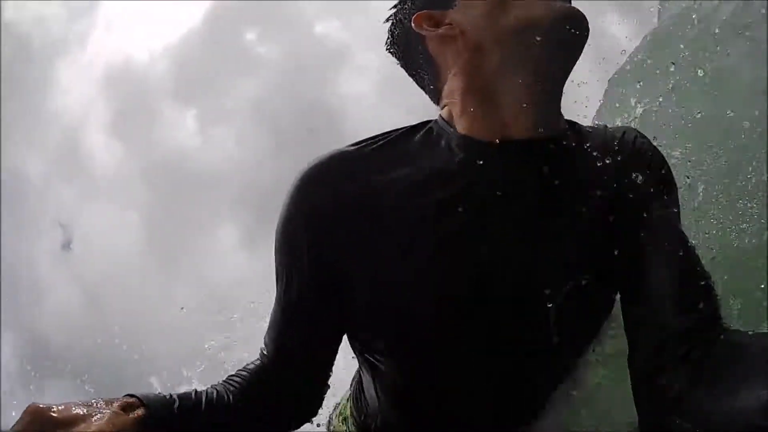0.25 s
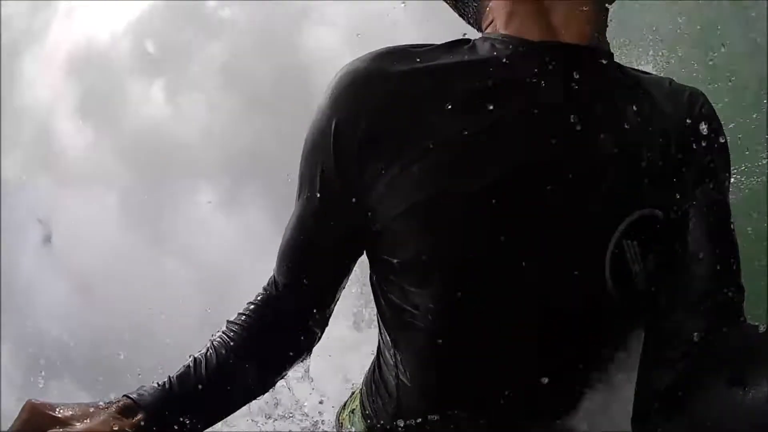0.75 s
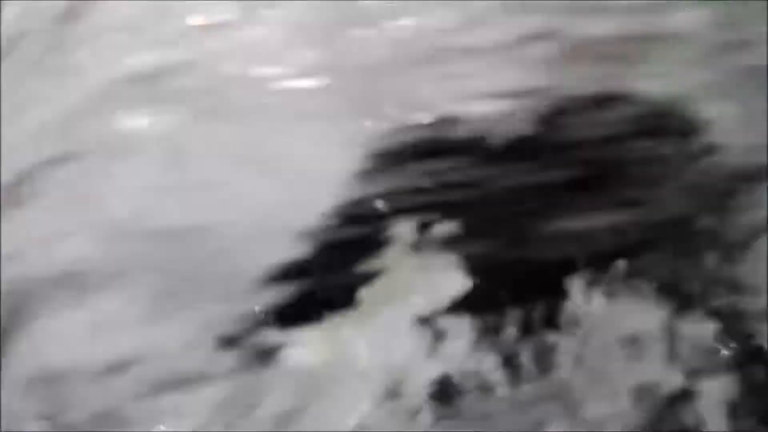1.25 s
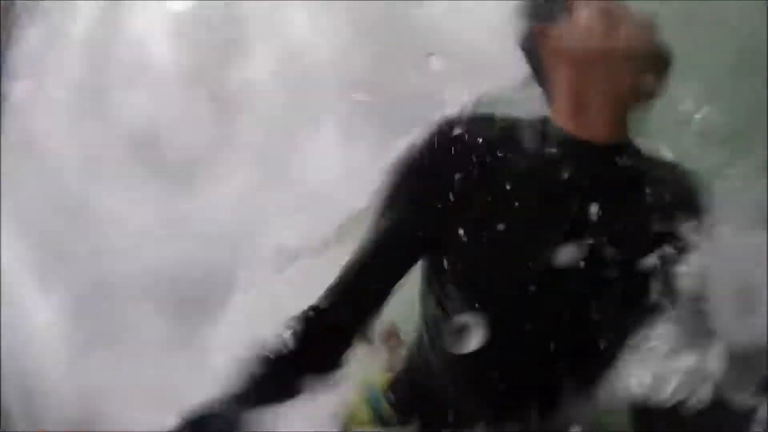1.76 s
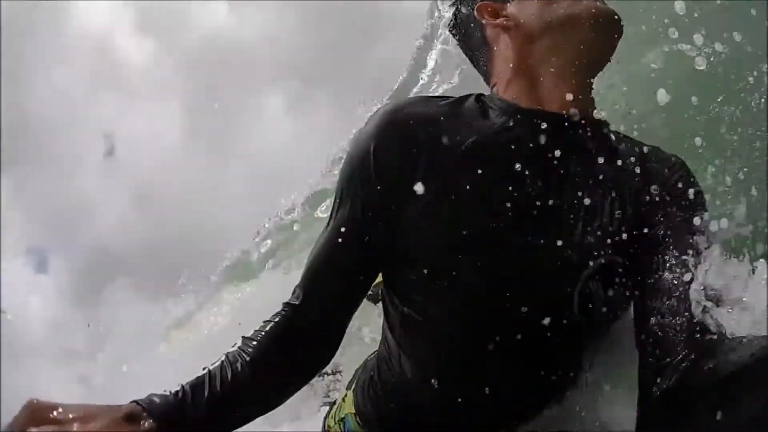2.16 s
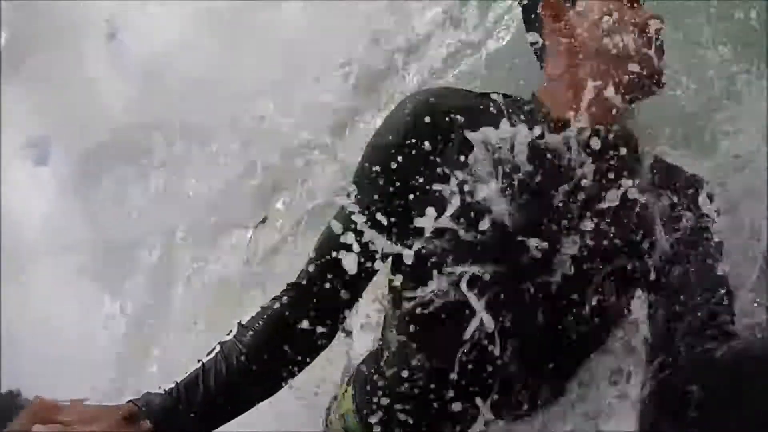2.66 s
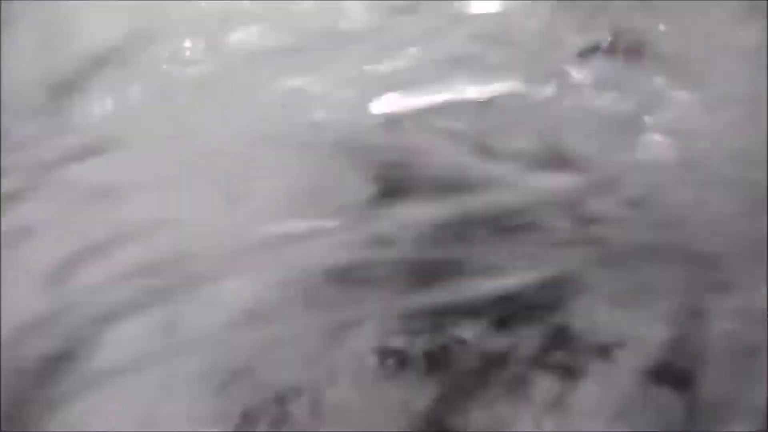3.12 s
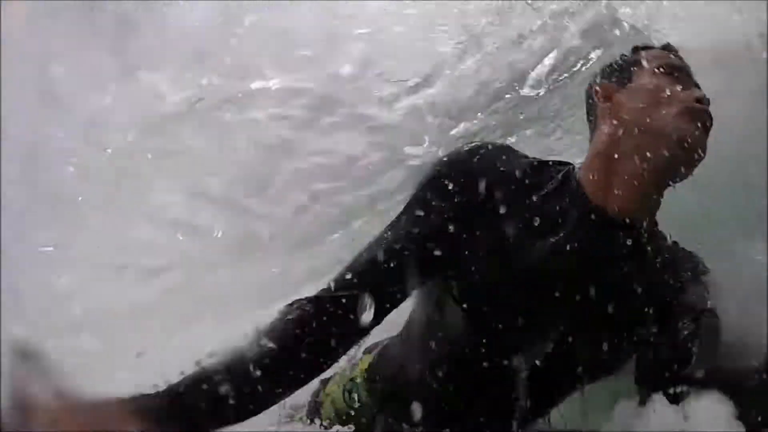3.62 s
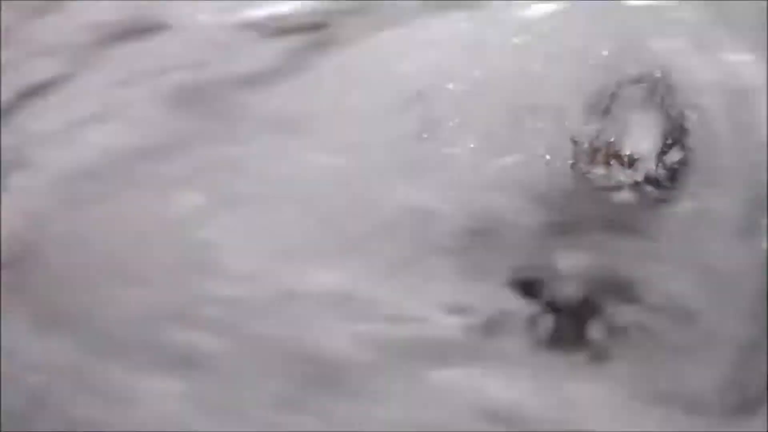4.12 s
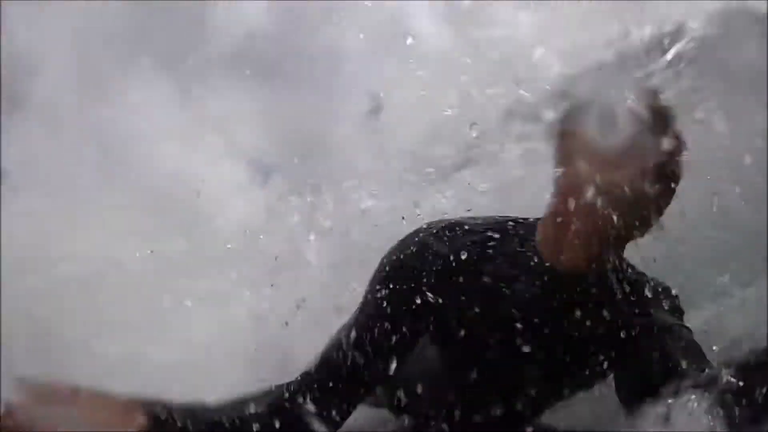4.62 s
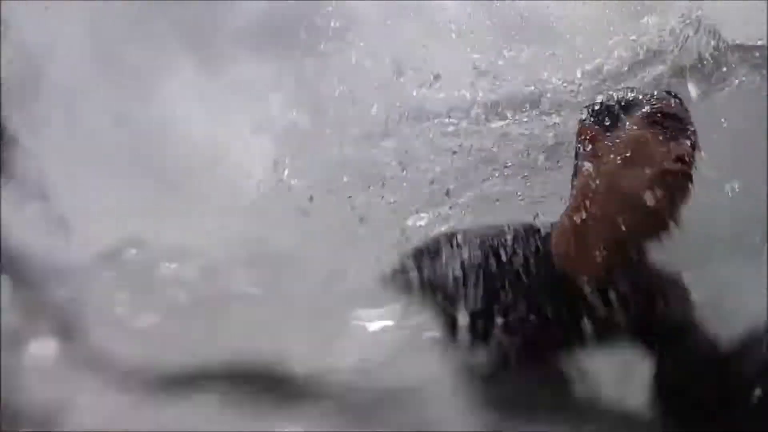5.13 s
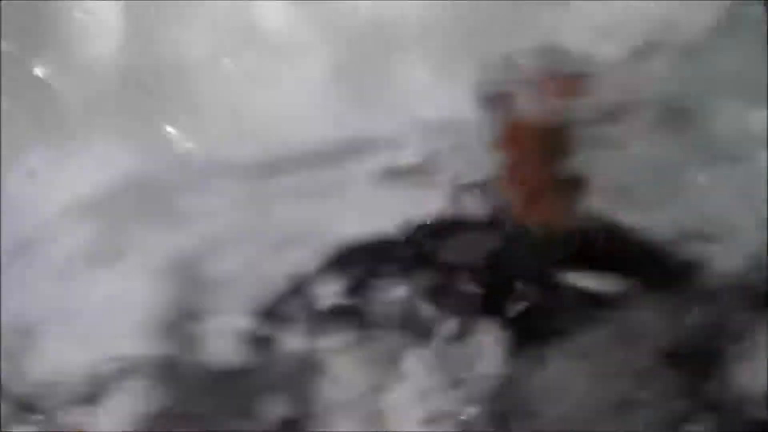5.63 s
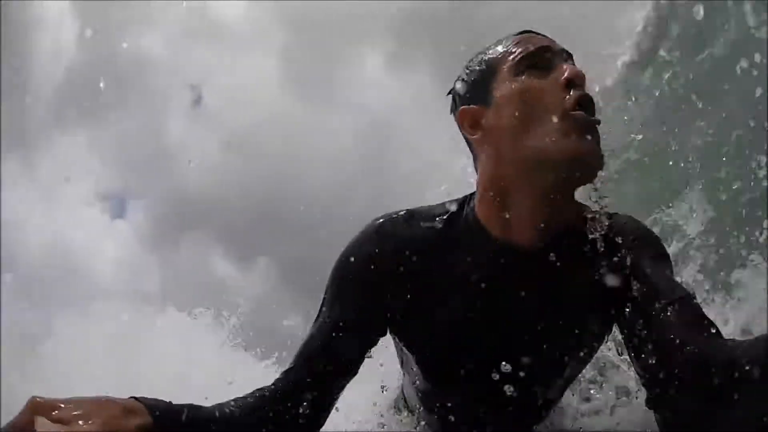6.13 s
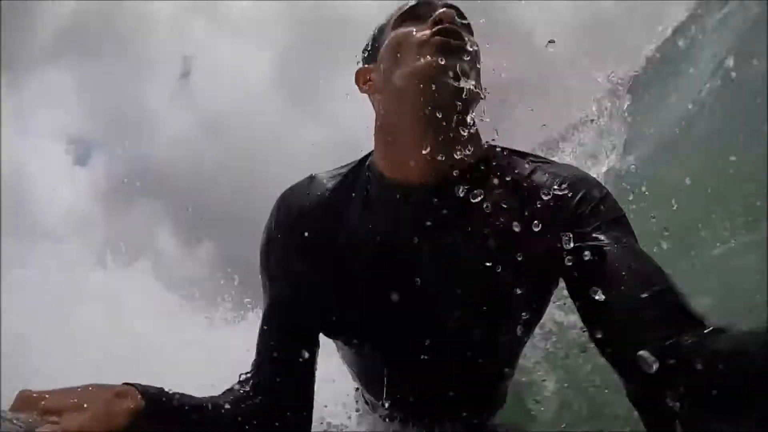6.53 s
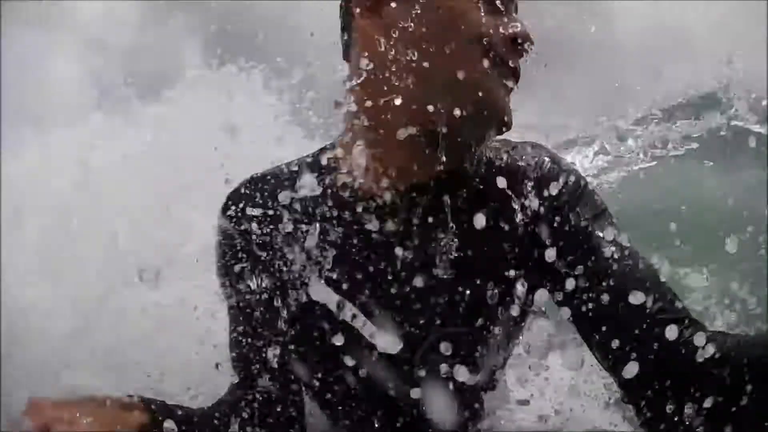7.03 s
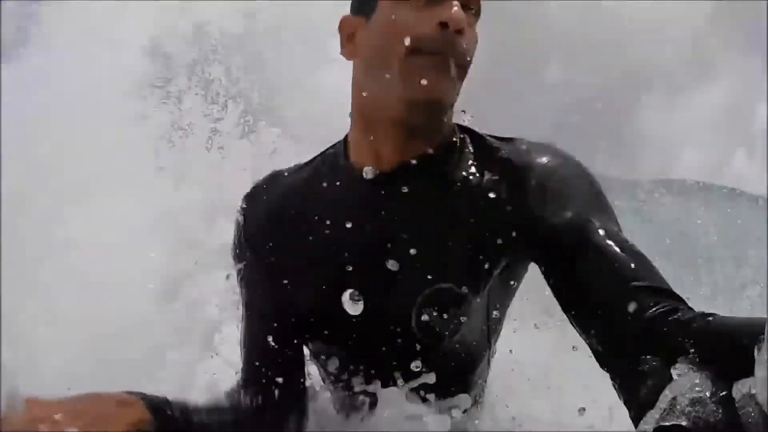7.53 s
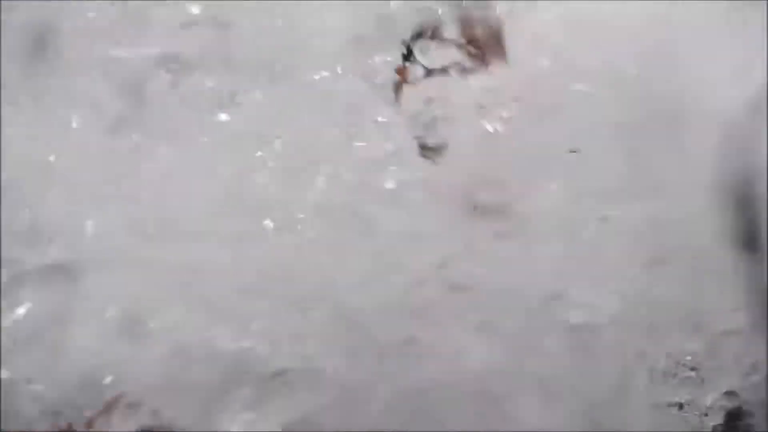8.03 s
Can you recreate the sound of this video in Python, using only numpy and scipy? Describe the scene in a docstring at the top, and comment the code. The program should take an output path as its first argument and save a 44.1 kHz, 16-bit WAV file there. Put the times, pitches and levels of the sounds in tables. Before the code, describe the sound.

Waves slap and douse an enclosed camera: low rumbling knocks, gurgling wash and crackling droplets surge in uneven blows between quieter stretches.

```python
"""Sealed camera in whitewater

Heard through a housing on a board: rocking and drumming as filtered low tones and noise, swelling in blows.
Water over the two ports is noise in lumps; spray is dense random grains, with gliding bubble rings.
Single splashes add a rising ring and a bright crack; narrow wavering bands of noise whistle briefly.
A faint hiss and regular ticks follow the loudness; the loudest surges overload the input."""
import sys
import numpy as np
from scipy import signal
from scipy.fft import rfft, irfft
from scipy.io import wavfile
from scipy.ndimage import uniform_filter1d

SR = 44100
rng = np.random.default_rng(int(sys.argv[2]) if len(sys.argv) > 2 else 0)


def volts_from_decibels(level):
    """Turn decibel levels (scalar or array-like) into linear amplitude factors."""
    exponent = np.asarray(level, float) / 20
    return 10 ** exponent


def generate_wav(signal):
    """Clip the signal to [-1, 1] and save it as 16-bit WAV at the path in sys.argv[1]."""
    frames = np.transpose(np.atleast_2d(signal))
    scaled = np.clip(frames, -1, 1) * 32767
    pcm = np.round(scaled).astype(np.int16)
    wavfile.write(sys.argv[1], SR, pcm)


N = 364707

# splashes on the shell: t/s, body level/dB, ring start f/Hz, crack level/dB (6 dB is taken off), left-right/dB
SPLASHES = [(0.103, -36, 2740, -44, 6), (0.7, -15, 686, -56, 6), (0.922, -7, 823, -46, 1),
            (0.931, -14, 1780, -43, 7), (0.956, -17, 2900, -28, -4), (1.014, -3, 670, -33, 12),
            (1.079, -33, 4700, -25, -5), (1.087, -19, 4250, -20, -2), (1.114, -10.5, 910, -52, 9),
            (1.189, -9, 664, -20, -3), (1.213, -5, 670, -6, -2), (1.214, -15.5, 4600, -27, 0),
            (1.255, -3, 3820, -9, 3), (1.252, -0.5, 1155, 4.5, 3.5), (1.294, -3, 1205, -29, 9),
            (1.336, 1.5, 487, -5, 0), (1.4, -2, 670, -3, 12), (1.497, -10.5, 656, -28, -7),
            (1.66, -16, 2390, -11, -6.5), (1.745, -10, 600, -26, 19), (1.821, -18, 506, -52, -1),
            (2.188, -26, 634, -18, 5), (2.212, 10, 653, -0.5, 5), (2.338, -15, 725, -57, 11),
            (2.595, -10, 494, -44, 6), (2.972, -20, 593, -13, -4), (3.001, -22, 892, -13, -1),
            (3.031, 2.5, 560, -21, -5.5), (3.036, -26, 2900, -5, 6), (3.118, -24, 2400, -1, -7.5),
            (3.146, 0.5, 1497, -30, 3.5), (3.185, -7, 690, -32, 1), (3.38, -18, 600, -28, 2),
            (3.686, -12, 633, -53, -1), (3.903, -13, 670, -21.5, 13), (3.932, -7.5, 455, -42, 14),
            (3.983, -3, 455, -52, -5), (4.037, -32, 700, -9, -1), (4.079, -24, 457, -12, -5.5),
            (4.194, -31, 615, -16.5, -4), (4.229, -23, 1520, -38, 7), (4.258, -9.5, 590, -41, 11),
            (4.272, -15.5, 2120, -13, -2), (4.311, -16, 613, -41, 17), (4.397, -17.5, 1340, -35, 9),
            (4.457, -19, 1750, -17.5, 1), (4.475, -22.5, 2000, -22, -3), (4.51, -13, 680, -46, 3),
            (5.241, -18, 624, -37, -9), (5.272, -20, 870, -28, -1), (5.412, -16, 513, -43, 1),
            (5.428, -35, 2800, -19.5, 1), (5.475, -25, 2460, -44, 7), (5.489, -18, 1030, -53, 15),
            (5.528, -30, 4100, -35, 3), (5.578, -28, 2740, -37, 2), (5.621, -16, 896, -39, 10),
            (5.637, -27, 4420, -36, -1), (5.645, -22, 885, -15.5, -3), (5.677, -12, 854, -42, 13),
            (5.681, -21.5, 2450, -26, -4), (5.704, -28.5, 2800, -38, 1), (5.786, -28, 700, -23.5, -6),
            (6.174, -17, 646, -35, 2), (6.516, -16.5, 580, -63, 8), (6.664, -13.5, 560, -57, -1),
            (6.819, -2, 574, -13, 2), (6.831, -12, 690, -9, 9), (6.86, -42, 3420, -10, 13),
            (6.88, -23, 4430, -27, -6), (6.886, -2, 443, -31, -6), (6.912, -20, 4360, -13, 11),
            (6.929, -15, 4480, -4, 8), (6.942, -14, 670, -14.5, 7.5), (7.045, -15, 1070, -55, 7),
            (7.335, -20.5, 894, -45, 13.5), (7.494, -31, 1410, -38, 3), (7.879, -30, 1200, -30, 2),
            (7.985, -26, 1050, -44, 7), (8.118, -26, 657, -17, -7), (8.166, -25, 820, -33, -2),
            (8.201, -13, 1200, -30, 1), (8.213, -24, 700, -28, 1), (8.235, 6, 600, -36.5, -1)]
# bending modes of the board: f/Hz, width/Hz, level/dB
BOARD_MODES = [(83.5, 34, 4), (116.1, 67.5, 9), (157.2, 33, -4), (209, 200, -8.5)]
# relative sound transmission of the housing: f/Hz, gain/dB
SHELL_GAIN = [(120, -50.5), (200, 2), (310, 4.5), (587, 5), (648, -1), (824, -5), (1190, -9.5), (2600, -17),
              (3860, -22), (5900, -49), (7670, -58.5), (13000, -120)]
# cavity in front of the left microphone: f/Hz, width/Hz, gain/dB
LEFT_CAVITY = [(272, 990, 5.5), (870, 340, -6), (960, 55, 3.5), (1200, 360, 6.5), (1820, 1220, -7),
               (2000, 290, 7), (3830, 230, -10), (5230, 130, 3.5), (6100, 870, -6.5)]
# cavity in front of the right microphone: f/Hz, width/Hz, gain/dB
RIGHT_CAVITY = [(670, 132, 12.5), (1200, 860, -5.5), (1814, 810, 6.5), (2226, 320, -2.5), (2883, 400, 7.5),
                (3640, 430, 2.5), (4330, 1100, 2.5), (4970, 200, -7)]
# steady ride between blows: t/s, rocking level/dB, drumming level/dB, wash level/dB, spray level/dB
STEADY_RIDE = [(0, -8, -34.5, -34, -47.5), (0.199, -51, -22, -34.5, -50.5), (.3, -23.5, -22, -28, -41),
               (.44, -23, -23, -27, -43), (.66, -22, -19.5, -27, -45), (.82, -35, -14, -24.5, -44),
               (1.1, -11, -16.5, -27, -33), (1.6, -22.5, -21.5, -22, -37.5), (2.1, -18, -21, -24.5, -40.5),
               (2.329, -24, -23, -25, -42.5), (2.5, -22.5, -21, -25, -37.5),
               (2.8, -16.5, -24.5, -33, -40.5), (3.45, -33.5, -31.5, -34, -42),
               (3.85, -25.5, -27, -32.5, -43.5), (4.349, -18.5, -23, -27.5, -36),
               (4.7, -21.5, -26, -32, -49), (4.95, -22, -18.5, -19.5, -40), (5.37, -23.5, -29, -41, -46),
               (5.9, -28.5, -23, -31, -42), (6.45, -20, -31, -39, -49.5), (7.1, -31, -20.5, -28, -39.5),
               (7.37, -30, -28, -39, -52.5), (7.6, -30, -26.5, -28, -46), (8.27, -18.5, -24, -48.5, -46)]
# shoves that set the mount swinging: t at full swing/s, hold/s, level/dB
SHOVES = [(.76, 0.045, -12.5), (1.08, 0.063, -22), (1.39, 0.0094, -8), (1.5, 0.013, -15.5),
          (1.66, 0.042, -12.5), (2.09, 0.046, -17), (2.42, 0.012, -14), (2.54, 0.019, -17.5),
          (2.7, 0.045, -14.5), (2.93, 0.076, -8), (3.059, 0.087, 0), (3.17, 0.03, -13.5),
          (3.73, 0.017, -16.5), (3.96, 0.015, -11), (4.06, 0.081, -10), (4.2, 0.052, -15),
          (4.99, 0.013, -12), (5.77, 0.016, -8), (5.95, 0.053, -9.5), (6.23, 0.0096, -8.5),
          (6.86, 0.084, -5), (7.06, 0.059, -9.5), (7.64, 0.011, -16.5), (7.701, 0.052, -3.5),
          (7.8, 0.15, -8.5), (8.21, 0.067, -12)]
# chop slamming the hull: t at full force/s, hold/s, level/dB
SLAMS = [(0.971, 0.016, -11), (1.152, 0.012, -25), (1.218, 0.045, -12), (1.3, 0.12, -18.5),
         (1.55, 0.046, -17), (1.66, 0.0086, -11), (2.04, 0.0053, -15), (2.209, 0.0056, -8),
         (2.656, 0.046, -12), (2.94, 0.071, -11), (2.997, 0.059, -2.5), (3.089, 0.13, -21),
         (3.31, 0.0058, -19.5), (3.94, 0.012, -13.5), (4.01, 0.097, -15.5), (4.87, 0.013, -20),
         (4.96, 0.09, -17.5), (5.53, 0.011, -22), (5.734, 0.055, -15), (6.184, 0.013, -5.5),
         (6.271, 0.062, -14.5), (6.7, 0.1, -22), (6.818, 0.0069, -4), (6.918, 0.018, -7.5),
         (7.019, 0.013, -9), (7.295, 0.0059, -15), (7.69, 0.048, -8.5), (8.21, 0.071, -15)]
# water thrown over the camera: t at full flow/s, hold/s, wash level/dB, spray level/dB, mist level/dB
DOUSES = [(.27, 0.16, -40, -50, -57.5), (0.948, 0.12, -21.5, -24.5, -36), (1.172, 0.031, -33, -22.5, -38.5),
          (1.215, 0.18, -16.5, -14.5, -26.5), (1.471, 0.04, -40, -20.5, -45),
          (1.66, 0.0085, -45, -39, -41.5), (1.75, 0.0047, -24, -30, -37), (1.839, 0.0055, -20.5, -26, -37),
          (2.208, 0.013, -12, -20.5, -28.5), (2.843, 0.1, -28, -35.5, -45.5), (2.973, 0.076, -17, -30, -32),
          (3.07, 0.034, -31, -41, -29.5), (3.115, 0.016, -18.5, -14, -24), (3.15, 0.043, -20.5, -19, -32.5),
          (3.29, 0.063, -27, -32.5, -47), (3.729, 0.0074, -30.5, -41, -52),
          (3.937, 0.069, -24.5, -27.5, -43), (4.006, 0.093, -25.5, -29.5, -38.5),
          (4.245, 0.072, -32, -24, -39.5), (4.466, 0.022, -45, -28.5, -50), (5.0, 0.12, -22, -36, -58),
          (5.24, 0.018, -52, -38, -48.5), (5.44, 0.15, -37, -35, -49), (5.611, 0.1, -42, -33, -45),
          (5.739, 0.045, -24, -34, -49), (5.82, 0.081, -33, -30.5, -49.5), (6.091, 0.09, -27.5, -35.5, -68),
          (6.175, 0.036, -23.5, -36, -43.5), (6.599, 0.18, -41.5, -42, -52.5), (6.67, 0.039, -42, -39, -54),
          (6.819, 0.018, -11.5, -25.5, -34), (6.905, 0.042, -13, -20.5, -31.5),
          (7.044, 0.037, -26.5, -29.5, -49), (7.71, 0.041, -29, -33, -44.5), (7.97, 0.066, -31, -33.5, -48),
          (8.108, 0.0045, -28.5, -32, -37.5), (8.206, 0.095, -16.5, -13, -31)]
# brief narrow wavering whistles: t/s, hold/s, f/Hz, level/dB
WHISTLES = [(.19, 0.14, 1870, -51.5), (.27, 0.15, 3150, -57), (.958, 0.073, 2860, -30.5)]
# edges of the wash bands that slop on their own: f/Hz
GURGLE_EDGES_HZ = [205, 300, 420, 560, 943]

ROCK_HZ = 32.76
LOW_SPLASH_T60_S = 0.042  # ring at 1600 Hz or below
TICK_START_S, TICK_EVERY_S = .0231, 2048 / 48000
HISS_DB, TICK_DB = -51, -17  # re compressed loudness
TOP_HZ = 8800
MIST_UNDER_SPRAY_DB = -13  # steady ride only
SHOVE_RISE_DB_PER_S, SHOVE_FALL_DB_PER_S = 218, 182
SLAM_RISE_DB_PER_S, SLAM_FALL_DB_PER_S = 530, 430
DOUSE_RISE_DB_PER_S, DOUSE_FALL_DB_PER_S = 530, 278
BLIPS_PER_S, BLIP_DB, BLIP_CYCLES = 35, -7, 8.2  # level re spray or mist; envelope scale
SPRAY_EVEN, MIST_EVEN, TOP_EVEN = 2.6, 2.4, 1.6  # even hiss under the single drops


def band(x, lo_hz, hi_hz, order=2):
    """Band-pass filter."""
    return signal.sosfilt(signal.butter(order, [lo_hz, min(hi_hz, .45 * SR)], "band", fs=SR, output="sos"), x)


def unit(x):
    """Scale to rms 1."""
    return x / np.sqrt(np.mean(x ** 2))


def walk(rate_hz):
    """Random levels held 1 / rate_hz and slewed twice; spread near 1."""
    k = int(SR / rate_hz)
    held = np.repeat(rng.standard_normal(N // k + 1), k)
    return 2.8 * uniform_filter1d(uniform_filter1d(held, k), k)[:N]


def pair(shared, facing=1):
    """Two noises with common power; facing scales the common part at right, negative inverts it."""
    left, right, both = rng.standard_normal((3, N))
    shared = np.clip(shared, 0, 1)
    common = np.sqrt(shared) * both * np.array([[1], [facing]])
    return common + np.sqrt(1 - shared) * np.array([left, right])


def patter(rate_hz, scatter_db, fade_s):
    """Envelope of random drops: many small, a few large, each spreading then dying away."""
    hit, size = rng.random(N) < rate_hz / SR, rng.exponential(size=N)
    power = hit * volts_from_decibels(np.minimum(scatter_db * size, 4 * scatter_db)) ** 2
    p = np.exp(-1 / (fade_s * SR))
    return unit(np.sqrt(np.abs(signal.lfilter([1], [1, -2 * p, p * p], power))))


def housing(x, size=4096):
    """Causal shell and port response per microphone, from the cepstrum of the log gain."""
    hz = np.arange(size // 2 + 1) * SR / size + 1
    shell_hz, shell_db = np.transpose(SHELL_GAIN)
    out = []
    for side, port in zip(x, (LEFT_CAVITY, RIGHT_CAVITY)):
        db = np.interp(np.log(hz), np.log(shell_hz), shell_db)
        db = db + sum(d / (1 + (2 * (hz - f) / w) ** 2) for f, w, d in port)
        cepstrum = irfft(np.log(volts_from_decibels(np.maximum(db, -90))))
        cepstrum[1:size // 2] *= 2  # fold to minimum phase
        cepstrum[size // 2 + 1:] = 0
        impulse = irfft(np.exp(rfft(cepstrum)))
        out.append(signal.fftconvolve(side, impulse)[:N])
    return np.array(out)


def blows(steady_db, start_s, held_s, peak_db, rise, fall):
    """Level in dB: each blow swells, holds and dies away, adding its power to the steady level."""
    t = np.arange(N)[::64] / SR
    early = start_s[:, None] - t
    late = t - (start_s + np.abs(held_s))[:, None]
    db = peak_db[:, None] - rise * np.maximum(early, 0) - fall * np.maximum(late, 0)
    power = np.sum(volts_from_decibels(db) ** 2, axis=0)
    return 10 * np.log10(volts_from_decibels(steady_db) ** 2 + np.interp(np.arange(N) / SR, t, power))


def grit(x):
    """Faint hiss and regular dry ticks, both rising and sinking with the loudness of x."""
    loudness = np.sqrt(np.abs(uniform_filter1d(np.mean(x ** 2, axis=0), size=2000))) ** 0.81
    at = (np.arange(TICK_START_S, N / SR, TICK_EVERY_S) * SR).astype(int)
    tick_db = TICK_DB + 4.5 * (rng.random(len(at)) - .5)
    ticks = np.zeros(N)
    ticks[at] = volts_from_decibels(tick_db) * rng.choice([-1, 1], len(at))
    hiss = volts_from_decibels(HISS_DB) * unit(band(pair(0.13), 3000, 9500))
    return loudness * (ticks + hiss)


def mount():
    """The camera rocks on its arm at a wavering rate, shaken by broader low buffeting."""
    swing = np.sin(2 * np.pi * np.cumsum(ROCK_HZ * (1 + 0.089 * walk(12))) / SR)
    buffeting = unit(band(pair(0.91), 14.0, 52.4))
    return unit(unit(swing) * volts_from_decibels(1.9 * walk(9.6)) + volts_from_decibels(-6.0) * buffeting)


def board():
    """Chop knocks heavily damped bending modes; both microphones feel nearly the same."""
    knocks = pair(.94) * (1.1 + patter(60, 3, .008))
    modes = sum(volts_from_decibels(db) * unit(band(knocks, hz - w / 2, hz + w / 2)) for hz, w, db in BOARD_MODES)
    return unit(band(modes, 45, 241.0, order=3))


def whistles():
    """Narrow wavering bands of noise that swell and fade."""
    t, out = np.arange(N) / SR, 0
    for s, held_s, hz, db in WHISTLES:
        rise_db = np.maximum(s - t, 0) * DOUSE_RISE_DB_PER_S
        fall_db = np.maximum(t - s - held_s, 0) * DOUSE_FALL_DB_PER_S
        level_db = db + 3.76 * walk(59.3) - np.minimum(rise_db + fall_db, 90)
        out = out + volts_from_decibels(level_db) * unit(band(pair(0.64, facing=-0.5), hz * .95, hz * 1.05))
    return out


def blips(spray_db, mist_db):
    """Droplets trap tiny bubbles that ring a few cycles, gliding up; each lands nearer one port."""
    when, pitch, size, side = rng.random((600, 4))[:int(BLIPS_PER_S * N / SR)].T
    starts, pitches_hz, sizes_db = (when * N).astype(int), 900 * 5.2 ** pitch, -4.0 * np.log(size)
    out, t = np.zeros((2, N + 1024)), np.arange(1024) / SR
    for i, hz, db, pan in zip(starts, pitches_hz, sizes_db, side):
        under_db = spray_db[i] if hz < 2250 else mist_db[i]
        cycles = hz * t / BLIP_CYCLES
        envelope = 2 * cycles * np.exp(1 - 2 * cycles)
        ring = np.sin(2 * np.pi * hz * t * (1 + 0.045 * cycles)) * envelope
        sides = np.array([[np.cos(pan * np.pi / 2)], [-np.sin(pan * np.pi / 2)]])
        out[:, i:i + 1024] += volts_from_decibels(under_db + BLIP_DB + min(db, 6)) * ring * sides
    return out[:, :N]


def wash():
    """Sheets of water slop across the ports in uneven lumps; each band gurgles on its own."""
    lumps = housing(pair(.7) * (2.6 + patter(160, 3.5, .0025)))
    edges = zip(GURGLE_EDGES_HZ, GURGLE_EDGES_HZ[1:])
    return unit(sum(volts_from_decibels(0.87 * walk(24)) * band(lumps, lo, hi) for lo, hi in edges))


def rattle(edges_hz, steady, force):
    """Big drops sound across the range, small ones in their own band; a harder stream is grainier."""
    big = patter(58, 6.5, 0.00024)
    hits = 0
    for lo, hi in zip(edges_hz, edges_hz[1:]):
        drops = 1.46 * big + 0.84 * patter(70, 5, 0.0005)
        grain = (steady + force * drops) / (steady + 2 * force)
        noise = unit(band(pair(0.41, facing=-0.5) * grain, lo, hi, order=3))
        hits = hits + noise * np.sqrt(hi - lo) * volts_from_decibels(1.35 * walk(20))
    return unit(housing(hits))


def spray(spray_db, mist_db):
    """Heavy drops knock low, mist ticks high; the top, above about 4.6 kHz, fades faster than the mist."""
    force = np.clip((spray_db + 50) / 22, .25, 1)
    heavy = volts_from_decibels(spray_db) * rattle([823, 1333, 1750, 2263], SPRAY_EVEN, force)
    mist = volts_from_decibels(mist_db) * rattle([2190, 2596, 3170, 4240, 4770], MIST_EVEN, force)
    top = volts_from_decibels(5.0 + 1.46 * mist_db) * rattle([4530, 5580, 6640, 9000], TOP_EVEN, force)
    return heavy + mist + top


def splashes():
    """Each slap bursts around the ring of its trapped air pocket, with a bright crack through the shell."""
    burst = housing(pair(0.63, facing=-1.82))
    bright = unit(band(np.gradient(burst, axis=1), 2100, 4800))
    bright = bright + volts_from_decibels(-14.5) * unit(band(pair(0.65, facing=-1), 3900, 6130, order=3))
    out, t = np.zeros((2, N)), np.arange(int(.1 * SR)) / SR

    def dying(speed):
        """Fast onset, then exponential decay."""
        return (1 - np.exp(-t / 0.00048)) * np.exp(-np.log(1000) * speed * t / LOW_SPLASH_T60_S)

    snap = dying(4.85)
    for s, db, hz, crack_db, pan_db in SPLASHES:
        i = int(s * SR)
        n = min(len(t), N - i)
        ring = np.sin(2 * np.pi * hz * t * (1 + 3 * t))  # the pocket shrinks, so the pitch climbs
        rush = unit(band(burst[:, i:i + n], 0.91 * hz, hz + 1100))
        body = volts_from_decibels(db) * (0.42 * ring[:n] + 0.5 * rush)
        body = body * dying(max(1, hz / 1600))[:n]  # small pockets die sooner
        crack = unit(bright[:, i:i + n] * snap[:n]) * np.sqrt(np.mean(snap[:n] ** 2))
        sides = volts_from_decibels(np.array([[pan_db], [-pan_db]]) / 2)
        out[:, i:i + n] += sides * (body + volts_from_decibels(crack_db - 6) * crack)
    return out


def scene():
    """All sounds as they reach the two microphones."""
    s, *columns = np.transpose(STEADY_RIDE)
    rock, drum, slop, drops = (np.interp(np.arange(N) / SR, s, c) for c in columns)
    rock_db = blows(rock, *np.transpose(SHOVES), SHOVE_RISE_DB_PER_S, SHOVE_FALL_DB_PER_S)
    drum_db = blows(drum, *np.transpose(SLAMS), SLAM_RISE_DB_PER_S, SLAM_FALL_DB_PER_S)
    at, held, *douse = np.transpose(DOUSES)
    steadies = (slop, drops, drops + MIST_UNDER_SPRAY_DB)
    wash_db, spray_db, mist_db = (
        blows(steady, at, held, peak, DOUSE_RISE_DB_PER_S, DOUSE_FALL_DB_PER_S)
        for steady, peak in zip(steadies, douse))
    ride = volts_from_decibels(rock_db) * mount() + volts_from_decibels(drum_db) * board()
    water = volts_from_decibels(wash_db) * wash() + spray(spray_db, mist_db) + blips(spray_db, mist_db)
    return ride + water + splashes() + whistles()


def top_cut(x):
    """Nothing passes above the cut-off."""
    return signal.sosfilt(signal.butter(12, 16500, fs=SR, output="sos"), x)


def record(dry):
    """Capsules round big swings, a coupling filter lets flat tops sag, the top is cut, the converter clips."""
    rounded = dry / (1 + np.abs(dry / 1.1) ** 6) ** (1 / 6)
    sagged = signal.lfilter(*signal.butter(1, 9, "high", fs=SR), rounded)
    low_pass = signal.ellip(6, .2, 30, TOP_HZ, fs=SR, output="sos")
    cut = signal.sosfiltfilt(low_pass, sagged + grit(sagged))
    clipped = np.clip(1.03 * cut, -1, 1)
    return top_cut(clipped)


dry = scene()
out = record(dry)
generate_wav(out)
```